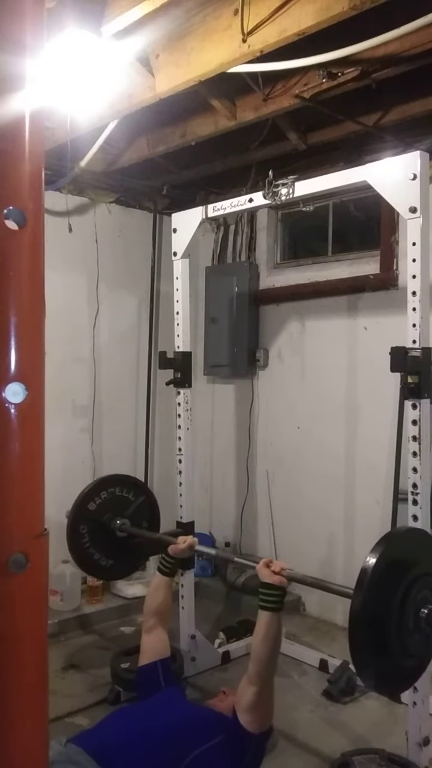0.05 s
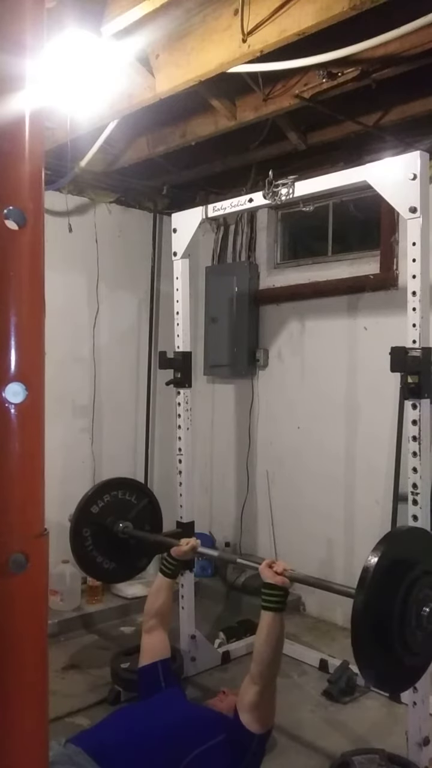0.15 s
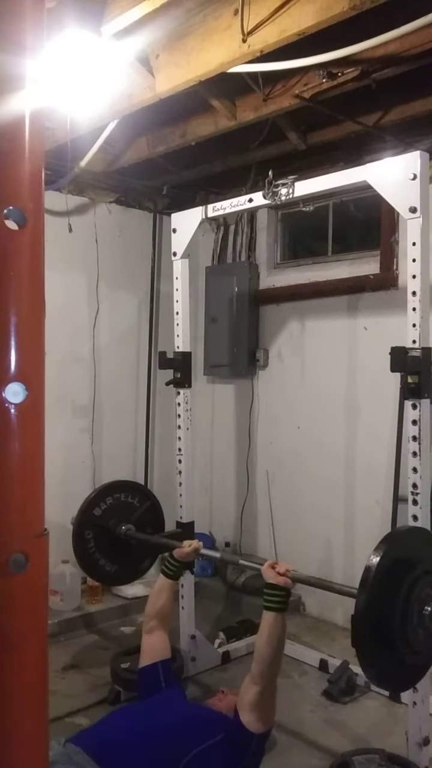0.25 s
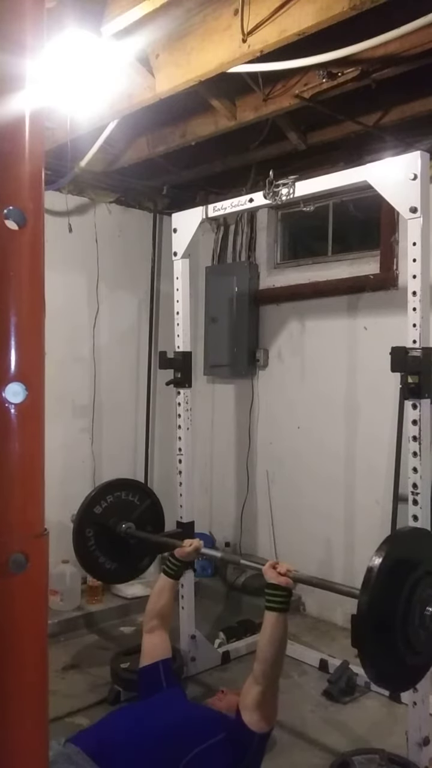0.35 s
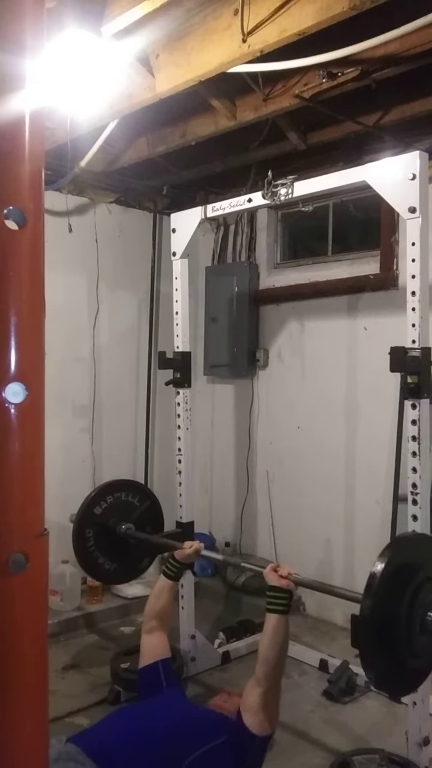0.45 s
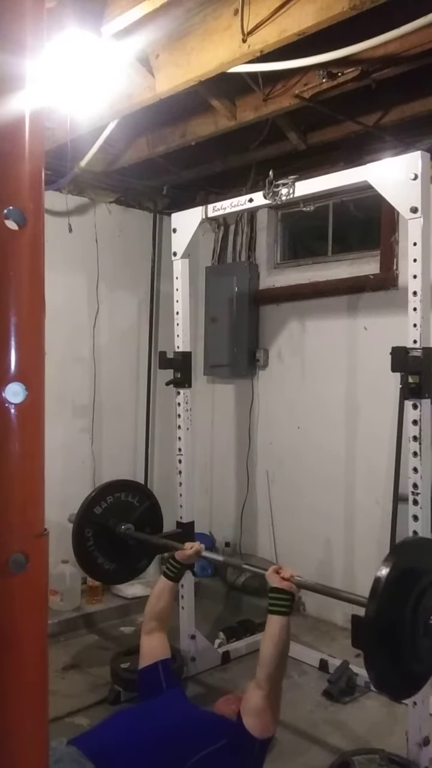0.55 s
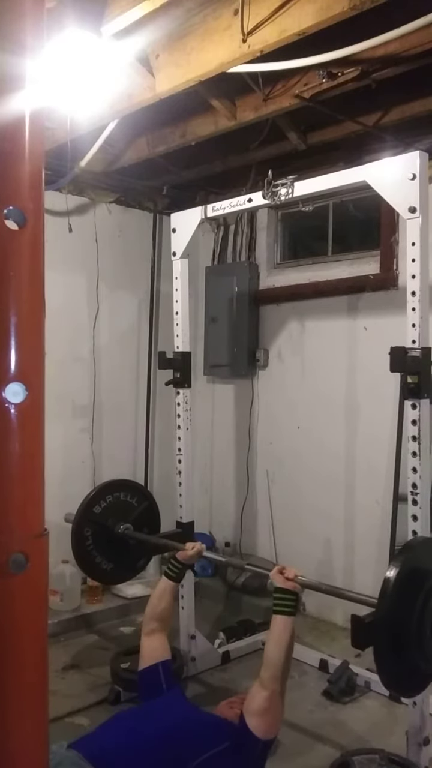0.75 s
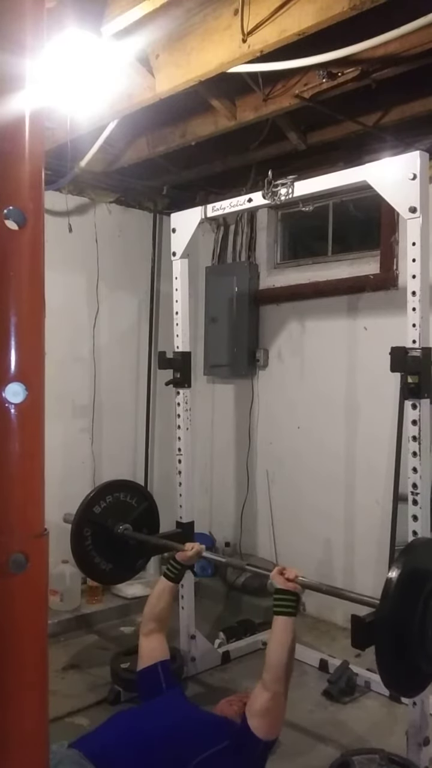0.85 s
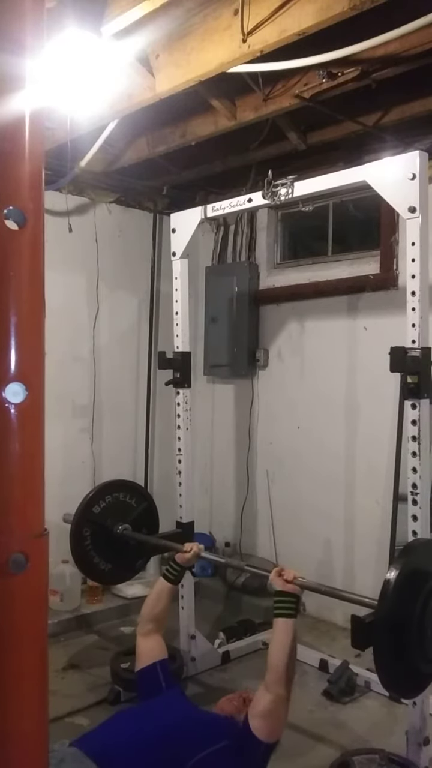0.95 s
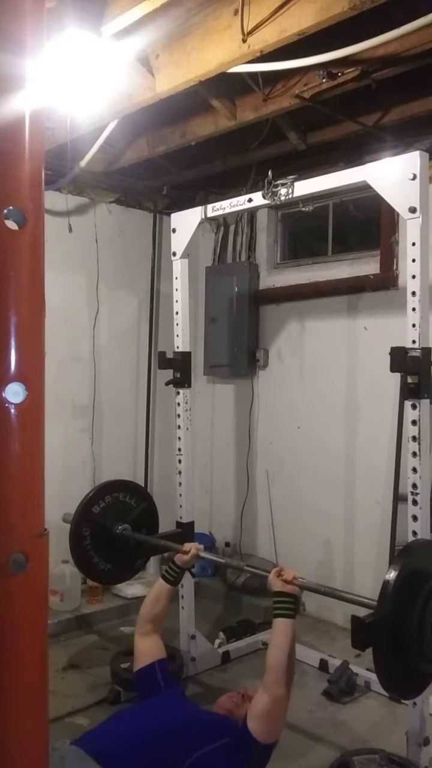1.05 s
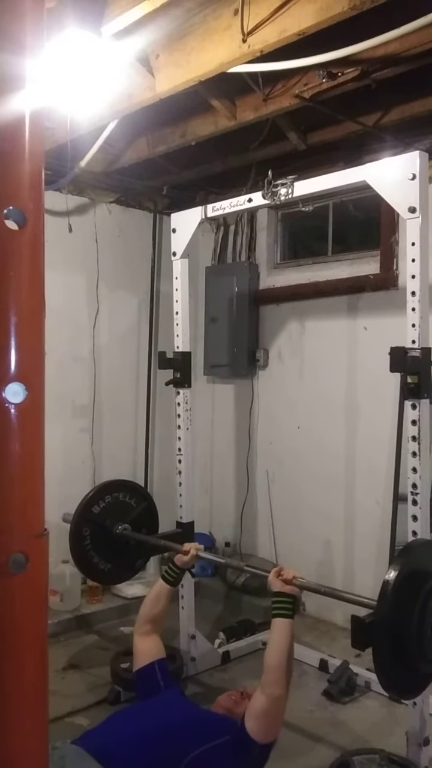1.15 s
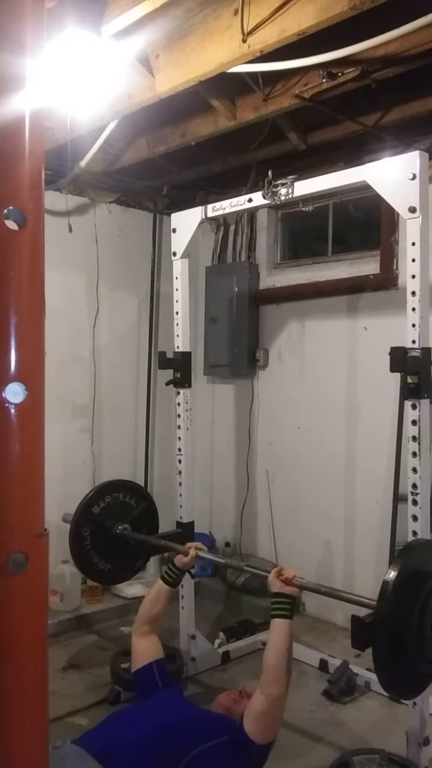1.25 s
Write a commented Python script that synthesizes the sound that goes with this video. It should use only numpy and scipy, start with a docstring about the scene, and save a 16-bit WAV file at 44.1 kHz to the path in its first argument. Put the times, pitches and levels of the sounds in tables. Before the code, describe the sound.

A steel barbell clanks into a rack in an echoing concrete basement. After a very faint ring, the bar hits the uprights at 0.2 seconds and chatters until 0.5. One end drops into its hook at 0.6 seconds, the other at about 0.75, each with a bright ring. The plates rattle and settle by about 1.2 seconds, while the rack gives a brief, faint low hum.

```python
"""A steel barbell rings faintly in a bare basement, then clanks against the rack's two uprights.
The loaded bar chatters there, and its ends drop into the hooks one after the other. The plates rattle
on the sleeves and settle, and the frame hums briefly under the weight. A phone microphone in the room
hears each blow as a near clatter and a ring of steel, prolonged by the concrete walls."""
import sys
import numpy as np
from scipy import signal
from scipy.fft import rfft, irfft, next_fast_len
from scipy.io import wavfile
from scipy.ndimage import map_coordinates

SR = 44100
rng = np.random.default_rng(int(sys.argv[2]) if len(sys.argv) > 2 else 0)


def wrap_up_sound(samples):
    """Save the sound to the file named by the first command line argument, as 16-bit audio."""
    columns = np.atleast_2d(samples).T
    # keep every value between -1 and 1, then stretch to whole-number steps
    tamed = np.clip(columns, -1, 1)
    steps = np.round(tamed * 32767).astype(np.int16)
    wavfile.write(sys.argv[1], SR, steps)


N = 57330
TIME = np.arange(N) / SR


def amp(db):
    """Decibels to gain."""
    return 10 ** (np.asarray(db) / 20)


def along(points, hz):
    """Read (Hz, value) points on a log frequency axis."""
    point_hz, values = np.transpose(points)
    return np.interp(np.log(hz + 1), np.log(point_hz + 1), values)


def fade(t60):
    """Decay by 60 dB in t60 seconds."""
    return amp(-60 * TIME / t60)


def rise(seconds):
    """Smooth onset with this time constant."""
    return 1 - np.exp(-TIME / seconds)


def wobble(rate):
    """A smooth random curve, rate knots a second."""
    return map_coordinates(rng.standard_normal(256), [TIME * rate], mode="wrap")


def filtered(x, response):
    """Apply a gain that depends on frequency."""
    size = next_fast_len(N + 8192)
    hz = np.fft.rfftfreq(size, 1 / SR)
    return irfft(rfft(x, size) * response(hz), size)[:N]


def noise(colour):
    """Noise of rms 1; colour gives dB for each frequency."""
    shaped = filtered(rng.standard_normal(N), lambda hz: amp(colour(hz)))
    return shaped / np.sqrt(np.mean(shaped ** 2))


def add(track, start_s, sound):
    """Mix a sound in from start_s."""
    start = round(start_s * SR)
    track[start:] += sound[:N - start]


# The bar before the first blow. Each row: frequency in Hz, level in dB, t60 in seconds.
FAINT_MODES = [(337, -64.5, 3.9), (870, -53, 0.76), (920, -52.5, 0.45), (1180, -61.5, 0.56),
               (1500, -63.5, 1)]
# Its echo off the walls. Each row: frequency in Hz, relative noise density in dB.
FAINT_ECHO_SPECTRUM = [(100, -47), (300, -13), (650, -2), (950, 17), (1300, 1), (2000, -17), (3300, -30),
                       (5000, -14), (8000, -45), (15000, -42)]


def faint_ring():
    """The bar still rings, wavering slightly, and dies away with its echo."""
    tones = sum(amp(db) * fade(t60) * np.sin(2 * np.pi * hz * TIME + 0.85 * wobble(25))
                for hz, db, t60 in FAINT_MODES)
    echo = amp(-58) * fade(t60=0.92) * noise(lambda hz: along(FAINT_ECHO_SPECTRUM, hz))
    return tones + echo


# Room tone at the microphone. Each row: frequency in Hz, relative noise density in dB.
AIR_SPECTRUM = [(25, -4), (90, -8), (300, -4.5), (1500, 4), (3300, -7.5), (5000, -6), (9000, -15),
                (15500, -15.5)]


def room_tone():
    """The still air of the basement, a low steady hiss."""
    return amp(-61) * noise(lambda hz: along(AIR_SPECTRUM, hz))


def contact(hz, brightness, favoured_hz):
    """Colour of one contact in dB: a harder one is brighter, and its place favours one band."""
    tilt_db = brightness * np.log2(np.clip(hz, 900, 14000) / 1600)
    octaves_away = np.log2((hz + 1) / favoured_hz)
    band_db = 3.5 * np.exp(-.5 * (octaves_away / 0.16) ** 2)
    return tilt_db + band_db


def steel_ring(modes, colour, scatter_db=2):
    """Decaying steel modes; every contact excites them a little differently."""
    hz, db, t60 = np.transpose(modes)
    gains = amp(db + colour(hz) + scatter_db * rng.standard_normal(len(hz)))
    phases = rng.uniform(0, 2 * np.pi, len(hz))
    return sum(gain * fade(decay_s) * np.sin(2 * np.pi * mode_hz * TIME + phase)
               for mode_hz, gain, decay_s, phase in zip(hz, gains, t60, phases))


# How far the steel's narrow peaks stand out. Each row: frequency in Hz, share of the full depth.
PEAK_SHARE = [(600, 0.25), (1800, 0.39), (4500, 0.87), (9000, 0.77)]


def fine_modes(depth_db, spacing_hz):
    """The countless narrow peaks of one steel assembly, as dB against frequency."""
    heights_db = depth_db * rng.standard_normal(2048)
    grid_hz = spacing_hz * np.arange(len(heights_db))
    return lambda hz: np.interp(hz, grid_hz, heights_db) * along(PEAK_SHARE, hz)


# Reverberation of the bare concrete room. Each row: frequency in Hz, t60 in seconds.
BASEMENT_T60 = [(150, 1), (280, 1), (450, 0.82), (1300, .57), (2400, 0.98), (3100, 0.48), (4000, 0.68),
                (6000, 0.52), (10000, 0.44), (15000, 0.36)]


def basement(steady):
    """A steady sound dies away between the walls, each frequency at its own speed."""
    hz, seconds, spectrum = signal.stft(steady, SR, nperseg=512)
    decay = amp(-60 * seconds / along(BASEMENT_T60, hz)[:, None])
    return signal.istft(spectrum * decay, SR, nperseg=512)[1][:N]


def clanks(blows, body, modes, peaks, ring_db):
    """Each contact gives a short near clatter, its reflections from the walls and a ring of steel."""
    track = np.zeros(N)
    onset = rise(seconds=0.0018)
    clatter_envelope = amp(3) * fade(t60=0.13)
    room_swell = amp(-1.33) * rise(seconds=0.0036)
    for start_s, db, brightness, favoured_hz in blows:
        colour = lambda hz: contact(hz, brightness, favoured_hz)
        wash = noise(lambda hz: along(body, hz) + peaks(hz) + colour(hz))
        clatter = clatter_envelope * wash[::-1]  # reversed: same colour as the room, another waveform
        reflections = room_swell * basement(wash)
        ring = amp(ring_db) * steel_ring(modes, colour)
        add(track, start_s, amp(db) * onset * (clatter + reflections + ring))
    return track


# The bar meets the uprights.
# Each row: start in seconds, level in dB, brightness in dB per octave, favoured frequency in Hz.
UPRIGHT_CONTACTS = [(.2008, -18.5, 0.9, 2280), (.212, -22.5, -8.5, 1500), (.293, -36.5, 4, 14000),
                    (.311, -26.5, -8, 1200), (.378, -21, 0.5, 2960), (.389, -21.5, -1.5, 990),
                    (.447, -24, -4, 1310), (.463, -28.5, -6.5, 1490), (.485, -30.5, -2.5, 1220),
                    (.506, -30, -1.5, 2950), (.519, -26, -4, 1260)]
# Overlapping resonances of plates and frame. Each row: frequency in Hz, relative noise density in dB.
UPRIGHT_SPECTRUM = [(90, -49), (180, -38), (280, -30), (480, -11.5), (600, -15.5), (720, -5), (850, -7.5),
                    (1200, 3), (1600, 0.5), (2000, -6.5), (2300, -2.5), (2650, -6.5), (4300, -14.5),
                    (6200, -17), (7500, -26.5), (11000, -34), (15500, -52)]
# The bar ringing on an upright. Each row: frequency in Hz, relative level in dB, t60 in seconds.
UPRIGHT_RING = [(683.4, -7, 0.82), (1203, 3, 0.44), (1465, -4.5, 0.34), (1682, -5, .7), (1733, -1, 0.56),
                (2285, -16, 0.68), (2440, -6, 0.49), (2690, -23, 0.88), (3450, -19, 0.3), (3766, -6, 0.52),
                (4237, -7, 0.25), (4960, -20, 0.29), (5110, -12, 0.34), (5840, -10, 0.24)]


def uprights():
    """The ends of the bar clank against the two uprights and chatter there."""
    peaks = fine_modes(depth_db=5, spacing_hz=40.25)
    return clanks(UPRIGHT_CONTACTS, UPRIGHT_SPECTRUM, UPRIGHT_RING, peaks, ring_db=-10.5)


# One end lands.
# Each row: start in seconds, level in dB, brightness in dB per octave, favoured frequency in Hz.
FIRST_HOOK_CONTACTS = [(.590, -25.5, 5, 5930), (.597, -16, -2.5, 1340), (.624, -21.5, -1.5, 1490),
                       (.659, -24.5, 3, 4300), (.676, -28.5, -2, 2880), (.711, -43, 3, 5050)]
# Plates and frame, struck at either hook. Each row: frequency in Hz, relative noise density in dB.
HOOK_SPECTRUM = [(90, -66), (130, -55), (185, -31), (260, -32), (360, -14.5), (700, -6.5), (900, -7),
                 (1250, 1.5), (1570, -8), (1750, 1.5), (1980, -11), (2220, -4), (2450, -12.5), (2950, -3.5),
                 (3500, -11.5), (6000, -15.5), (7600, -24), (11000, -29.5), (13000, -41.5), (15500, -45)]
# The first hook ringing. Each row: frequency in Hz, relative level in dB, t60 in seconds.
FIRST_HOOK_RING = [(1054, 0, .45), (1205, -8, 0.45), (1434, 4, 0.25), (1720, 5.5, 0.48), (2176, 3, 0.37),
                   (2690, -11, 0.68), (2750, -28, 0.56), (3040, -3.5, 0.42), (4410, -10, 0.25),
                   (5310, -22, 0.31), (5410, -11, 0.26), (5650, -23, .35)]


def first_hook():
    """One end of the bar drops into its hook and rattles."""
    peaks = fine_modes(depth_db=6.5, spacing_hz=39.76)
    return clanks(FIRST_HOOK_CONTACTS, HOOK_SPECTRUM, FIRST_HOOK_RING, peaks, ring_db=-11)


# The other end lands and the plates settle.
# Each row: start in seconds, level in dB, brightness in dB per octave, favoured frequency in Hz.
SECOND_HOOK_CONTACTS = [(.749, -21, -3.5, 1210), (.757, -19.5, -1.5, 3080), (.768, -21.5, -5.5, 3270),
                        (.810, -22.5, 1, 3600), (.827, -24.5, -1, 4500), (.841, -26, 1.4, 4500),
                        (.853, -25, -9.5, 1220), (.884, -32.5, -4.5, 720), (.919, -31.5, -14, 1300),
                        (.984, -33.5, -8.5, 554), (1.023, -45, 4.5, 11000), (1.048, -42.5, -1.5, 2500),
                        (1.088, -41, -3, 1390), (1.14, -46, -1, 2000)]
# The second hook ringing. Each row: frequency in Hz, relative level in dB, t60 in seconds.
SECOND_HOOK_RING = [(1116, -4.5, 0.25), (1250, 1, 0.4), (1269, 2.5, 0.21), (1424, 1, 0.7), (1736, -4, 0.3),
                    (2180, 4.5, 0.43), (3020, -12, 0.41), (3290, -8, 0.29), (3460, -5, 0.42),
                    (4500, -1, 0.26), (5168, -7, 0.42), (5210, -6, 0.55), (6560, -12, .45),
                    (8100, -20, 0.49)]


def second_hook():
    """The other end drops in, and the plates rattle to rest on the sleeves."""
    peaks = fine_modes(depth_db=4, spacing_hz=34.64)
    return clanks(SECOND_HOOK_CONTACTS, HOOK_SPECTRUM, SECOND_HOOK_RING, peaks, ring_db=-10.5)


def frame_hum(start_s=0.925, hz=192):
    """The rack rocks and hums low as it takes up the weight."""
    track = np.zeros(N)
    envelope = amp(-45) * rise(seconds=0.03) * fade(t60=0.49)
    add(track, start_s, envelope * np.sin(2 * np.pi * hz * TIME + 0.6 * wobble(20)))
    return track


def scene():
    """The barbell is racked over the quiet of the basement, heard from one spot in mono."""
    racking = uprights() + first_hook() + second_hook() + frame_hum()
    return (racking + faint_ring() + room_tone())[None]


def record(dry):
    """The phone microphone cuts the bass and keeps nothing above its band limit."""
    low_cut_hz, top_hz = 161, 16050
    thin = signal.sosfilt(signal.butter(3, low_cut_hz, "highpass", fs=SR, output="sos"), dry)
    return np.array([filtered(channel, lambda hz: hz < top_hz) for channel in thin])


dry = scene()
out = record(dry)
wrap_up_sound(out)
```